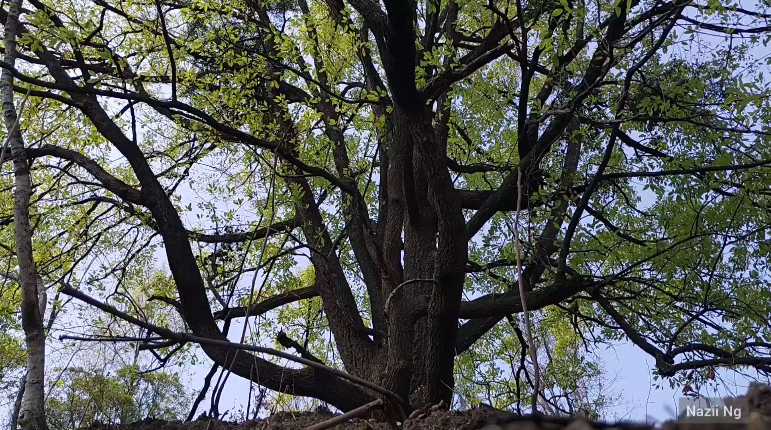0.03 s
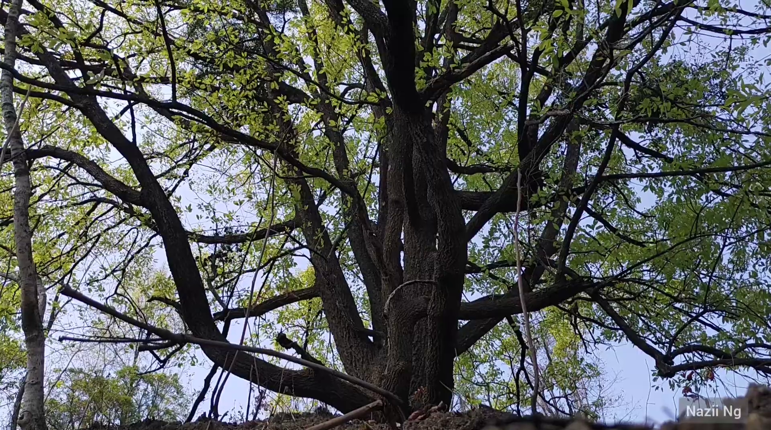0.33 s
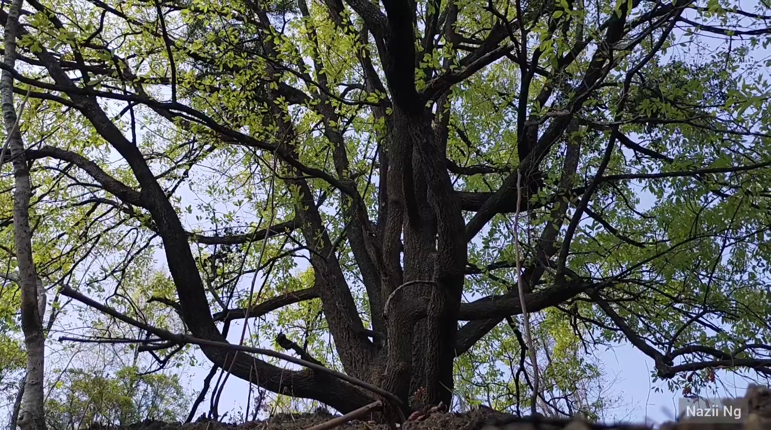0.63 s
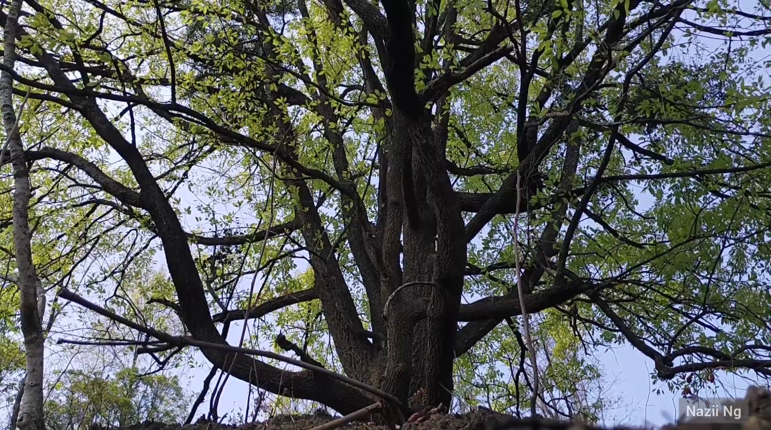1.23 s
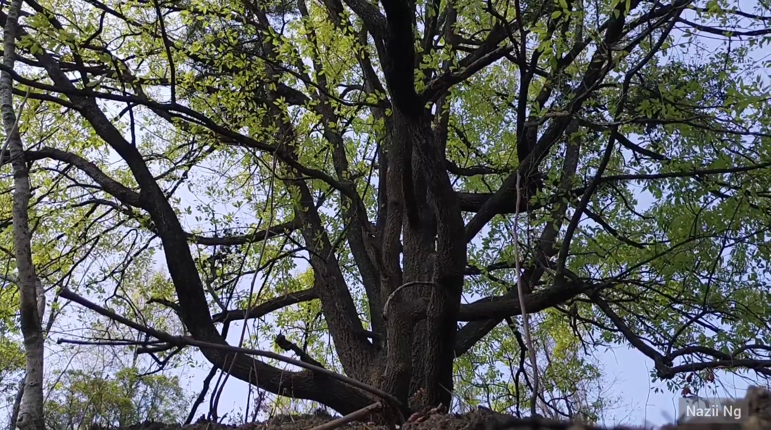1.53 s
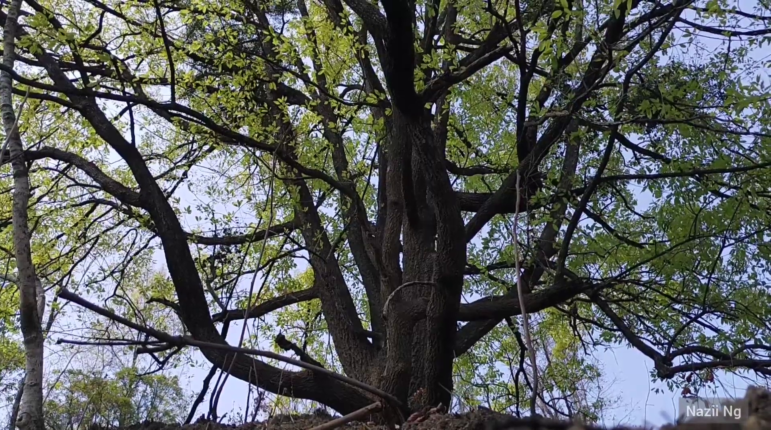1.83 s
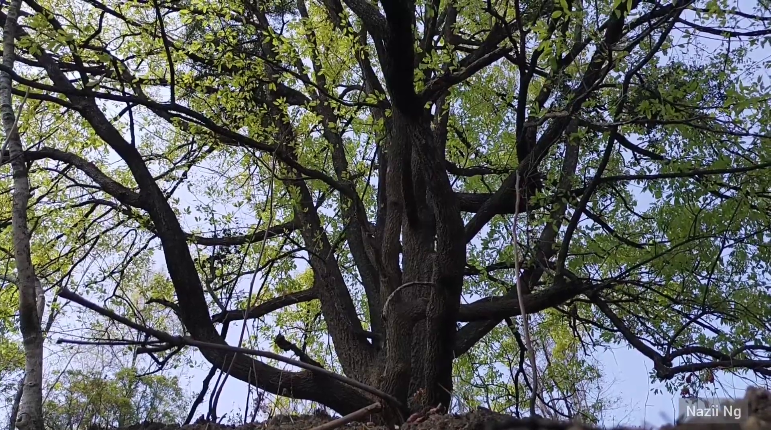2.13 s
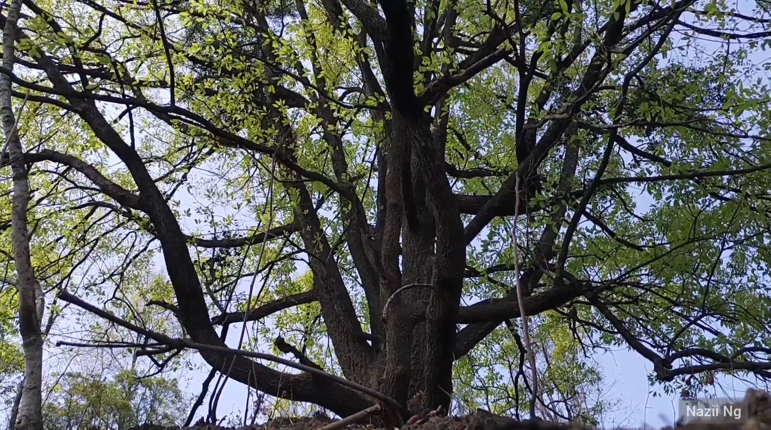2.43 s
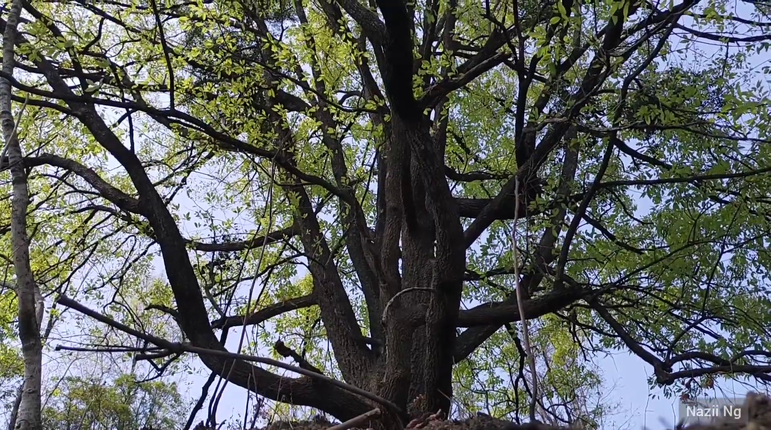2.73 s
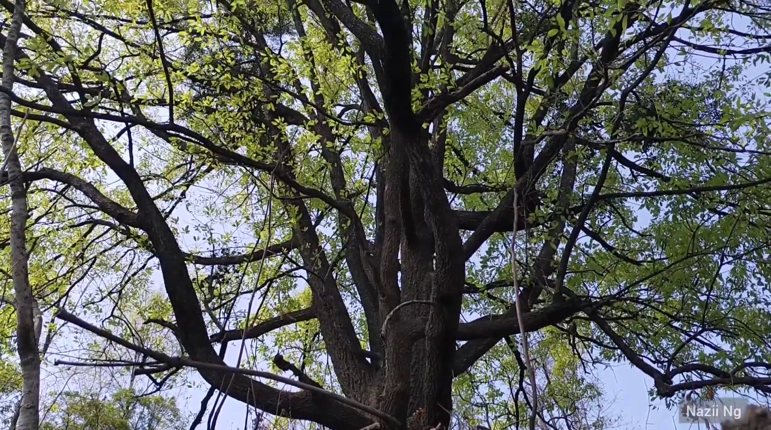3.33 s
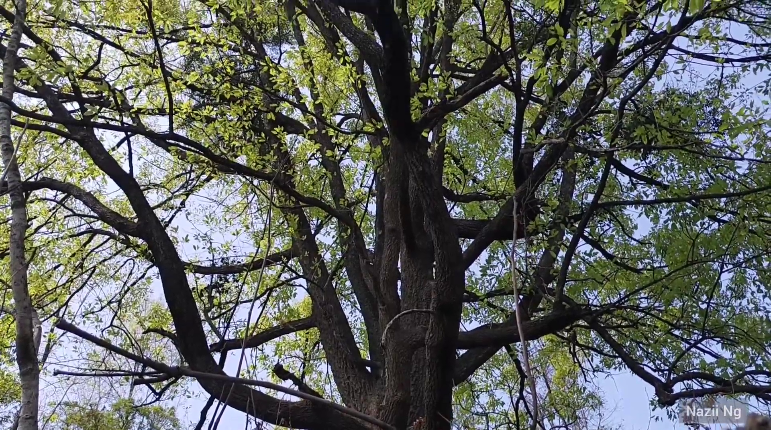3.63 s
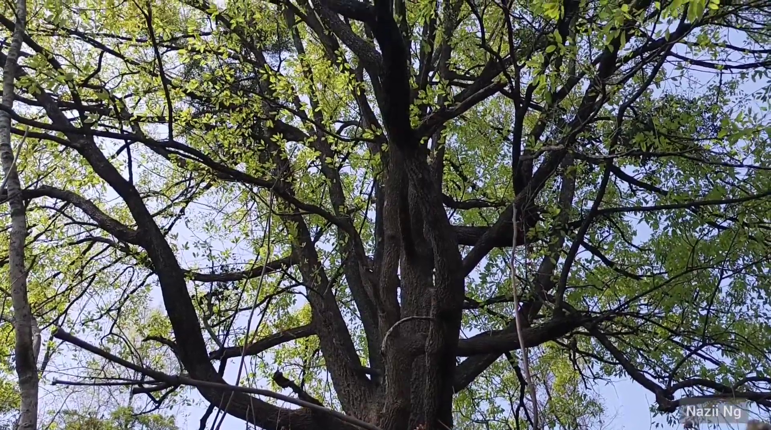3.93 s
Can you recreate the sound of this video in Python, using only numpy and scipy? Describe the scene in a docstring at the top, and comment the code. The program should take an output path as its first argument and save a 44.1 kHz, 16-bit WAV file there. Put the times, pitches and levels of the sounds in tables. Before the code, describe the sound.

A cuckoo gives a falling two-note call in a quiet wood, then repeats it as a distant finch trills. Faint whistles and chirps from other birds sit behind it, with soft, uneven wind rumble on the microphone.

```python
"""After a moment of silence, the hush of a spring wood swells in with a dying echo. Small birds whistle
far off, and a breeze starts to bump against the microphone. Leaves brush close by. Near 0.8 s a cuckoo
calls from a tree: a short note that rises and falls, then a longer, level one a third lower, each an
almost pure tone begun by a puff of air. The wood echoes it. From about 2 s a distant finch sings a
falling trill. Near 2.6 s the cuckoo calls again, and a small bird's warble ends the scene."""
import sys
import numpy as np
from scipy import signal
from scipy.fft import rfft, irfft
from scipy.io import wavfile
from scipy.ndimage import uniform_filter1d

SR = 44100
rng = np.random.default_rng(int(sys.argv[2]) if len(sys.argv) > 2 else 0)


def generate_wav(signal):
    """Clip the signal to [-1, 1] and save it as 16-bit WAV at the path in sys.argv[1]."""
    frames = np.transpose(np.atleast_2d(signal))
    scaled = np.clip(frames, -1, 1) * 32767
    pcm = np.round(scaled).astype(np.int16)
    wavfile.write(sys.argv[1], SR, pcm)


N = 176400
T = np.arange(N) / SR

# tone colour of the wood's hush: (frequency [Hz], relative level [dB])
HUSH_COLOUR = [(20, -3), (80, 0), (250, 0), (500, -2), (1100, 0), (1700, -8), (2500, -10.5), (3200, -8.5),
               (4500, -16), (6000, -17.5), (7400, -20.5), (8000, -32.5), (8600, -37.5), (14000, -49)]
# how the breeze swells and sinks: (time [s], level [dB])
BREEZE_LEVELS = [(.23, -91), (.28, -67.5), (.4, -55.5), (.58, -57.5), (.63, -33), (.76, -49), (.85, -31.5),
                 (.99, -39.5), (1.08, -56), (1.2, -46), (1.38, -54), (1.48, -28.5), (1.59, -46),
                 (1.72, -34), (1.8, -36), (2.0, -39), (2.17, -51), (2.3, -48.5), (2.49, -35), (2.8, -33.5),
                 (2.87, -42.5), (3.15, -37.5), (3.22, -40), (3.42, -34.5), (3.58, -32.5), (3.7, -53.5),
                 (3.82, -45.5), (3.96, -30), (4.0, -59)]
# tone colour of the breeze's rumble: (frequency [Hz], relative level [dB])
RUMBLE_COLOUR = [(15, -38), (30, -17.5), (50, 7.5), (75, 5), (120, -2), (170, -19.5), (240, -33.5),
                 (350, -38), (700, -73), (2000, -100)]
# the strongest bumps of air: (time [s], width [s], level [dB])
AIR_BUMPS = [(0.622, 0.0032, -28.5), (.645, 0.0061, -28), (0.698, 0.0027, -19), (0.91, 0.0019, -23.5),
             (1.003, 0.0041, -26), (1.463, 0.0021, -31), (1.5, 0.0023, -20.5), (1.7, 0.0023, -18),
             (1.888, 0.0029, -27), (1.952, 0.0043, -24), (2.023, 0.0035, -24.5), (2.386, 0.0036, -20.5),
             (2.719, 0.0035, -21.5), (2.823, 0.0032, -23), (2.935, 0.0022, -24), (3.183, 0.0041, -29),
             (3.372, 0.0025, -21), (3.44, 0.0025, -24.5), (3.506, 0.0027, -21.5), (3.569, 0.0022, -27.5)]
# leaves brushing close by: (time [s], width [s], level [dB])
LEAF_BRUSHES = [(.632, 0.016, -62), (.854, 0.0033, -52.5)]
# tone colour of the leaves: (frequency [Hz], relative level [dB])
LEAF_COLOUR = [(800, -21), (2000, -2), (4000, 3.5), (6800, 3.5), (7800, -11.5), (8500, -35)]
# thin, very high song: (start [s], length [s], first pitch [Hz], last pitch [Hz], level [dB])
HIGH_PHRASES = [(0.252, 0.77, 6340, 6510, -68), (1.451, .95, 6210, 6240, -74),
                (2.848, 1.0, 6390, 6110, -77.5)]
# small birds' notes:
# (start [s], length [s], first pitch [Hz], middle pitch [Hz], last pitch [Hz], relative level [dB])
BIRD_NOTES = [(0.155, 0.085, 4050, 4270, 4360, -69.5), (0.353, 0.062, 3750, 3690, 3780, -64),
              (1.67, 0.089, 3158, 3530, 3387, -55.5), (1.7, .22, 3505, 3496, 3418, -53.5),
              (1.886, 0.054, 3570, 3740, 3910, -59.5), (2.416, .085, 2087, 2144, 2204, -57.5),
              (2.492, 0.1, 2320, 2317, 2330, -64), (2.555, .09, 2066, 1964, 1960, -68),
              (2.761, 0.052, 1576, 1637, 1660, -62), (3.078, 0.032, 1754, 1640, 1610, -59.5),
              (3.211, 0.072, 2387, 2066, 2074, -55), (3.522, 0.042, 1990, 2083, 2520, -57.5),
              (3.554, 0.09, 2570, 3360, 2830, -54.5), (3.726, 0.063, 1464, 1612, 1630, -56.5),
              (3.761, 0.034, 1727, 1712, 1670, -49.5), (3.759, 0.043, 3710, 3680, 3800, -67.5),
              (3.792, 0.041, 2960, 2750, 2510, -62.5), (3.836, 0.084, 2240, 2335, 2190, -61.5)]
# quick rising chirps between the trill's last notes: (start [s], relative level [dB])
CHIRPS = [(2.625, -51.5), (2.785, -55.5), (2.934, -54), (3.087, -62), (3.231, -54)]
# the path of a warble: (time [s], centre pitch [Hz], relative level [dB])
WARBLE_SHAPE = [(3.81, 1767, -57), (3.88, 1912, -53.5), (3.94, 1917, -56.5), (4.0, 1920, -76)]
# the finch's falling notes: (start [s], top pitch [Hz], bottom pitch [Hz], relative level [dB])
TRILL_NOTES = [(1.96, 4000, 3750, -80.5), (2.055, 4240, 4010, -62), (2.155, 4400, 4270, -61.5),
               (2.225, 4400, 3910, -63.5), (2.285, 4410, 4060, -58), (2.335, 4210, 2960, -59),
               (2.38, 4500, 3870, -62), (2.425, 4110, 2940, -53), (2.505, 4230, 3197, -55.5),
               (2.59, 4000, 2855, -51.5), (2.675, 3900, 2830, -74.5), (2.74, 4000, 2896, -59.5),
               (2.885, 3960, 2994, -56), (3.033, 3900, 2697, -53), (3.18, 3900, 2950, -67)]
# echoes of the cuckoo's long note, drawn out by the trees: (delay [s], swell time [s], top level [dB])
LONG_ECHOES = [(.17, 0.081, -42.5), (.258, 0.094, -38.5), (.57, .13, -53.5), (1.15, .15, -63)]
# the dying echo of an earlier call: (start [s], pitch [Hz], level [dB], fall [dB/s])
DYING_ECHO = (.17, 497, -49, 130)
# tone colour of the puff that starts a cuckoo note: (frequency [Hz], relative level [dB])
PUFF_COLOUR = [(150, -40), (400, -12), (600, 0), (780, -5), (1100, -22), (2000, -45), (5000, -80)]
# the cuckoo's short note: (time in the note [s], pitch [Hz], level [dB])
SHORT_NOTE = [(0, 493.5, -52), (.018, 547, -32.5), (.038, 575.5, -20), (.058, 615.5, -26.5),
              (.092, 629.8, -24.5), (.111, 612, -30.5), (.123, 596, -17.5), (.139, 545, -26),
              (.15, 491, -50.5)]
# the cuckoo's long note: (time in the note [s], pitch [Hz], level [dB])
LONG_NOTE = [(0, 481, -40), (.009, 497.3, -31), (.035, 504.8, -26), (.11, 504, -24), (.165, 504, -26),
             (.205, 499, -30.5), (.23, 485.7, -35.5), (.241, 441, -46)]
# faint higher tones in the short note: (pitch multiple, level against the main tone [dB], peak time [s])
SHORT_OVERTONES = [(2, -35.5, 0.044), (3, -35, 0.076), (6, -47, 0.1), (7, -33, 0.09)]
# faint higher tones in the long note: (pitch multiple, level against the main tone [dB], peak time [s])
LONG_OVERTONES = [(2, -36, 0.042), (3, -42.5, 0.12), (4, -45, 0.051), (6, -43.5, .17)]
# cuckoo calls: (short note's start [s], long note's start [s], short note's pitch factor, gain [dB])
CALLS = [(0.774, 1.121, .997, 0), (2.558, 2.914, 1.007, 0)]

SILENCE_S = 0.1945
HUSH_DB, HUSH_RISE_S, HUSH_RISE_DB = -60.5, .11, 13
WARBLE_PER_S, WARBLE_DEPTH = 33, 0.075
ECHO_HZ, ECHO_WAVER_HZ = 502, 1.1
SHORT_ECHO_S, SHORT_ECHO_DB = 0.17, -25.5
SHORT_SCATTER_DB, LONG_SCATTER_DB = -12.5, -23
CUCKOO_WAVER, RASP_DB = 0.0017, -40.5


def amp(db):
    """Turns decibels into a number to multiply a sound by."""
    return 10 ** (np.asarray(db) / 20)


def unit(x):
    """Scales a signal so that its average power is 1."""
    return x / np.sqrt(np.mean(x ** 2) + 1e-20)


def curve(points, t, column=1):
    """Reads a table's column at times t, joining its points with straight lines."""
    rows = np.array(points)
    return np.interp(t, rows[:, 0], rows[:, column])


def add(mix, start, sound):
    """Mixes a sound in at a start time in seconds."""
    part = mix[max(round(start * SR), 0):][:len(sound)]
    part += sound[:len(part)]


def keep_side(x, side, hz, order=2):
    """Keeps the "low" or "high" side of hz; a bigger order cuts more sharply."""
    return signal.sosfilt(signal.butter(order, hz, side, fs=SR, output="sos"), x)


def noise(colour):
    """Steady noise with the given tone colour."""
    hz, db = np.transpose(colour)
    gain = amp(np.interp(np.log(np.fft.rfftfreq(N, 1 / SR) + 1), np.log(hz), db))
    return unit(irfft(rfft(rng.standard_normal(N)) * gain, N))


def wander(size, hz):
    """A smooth random wobble, mostly slower than hz."""
    freqs = np.fft.rfftfreq(SR, 1 / SR)
    spectrum = rfft(rng.standard_normal(SR)) / (1 + (freqs / hz) ** 4)
    return np.resize(unit(irfft(spectrum, SR)), size)


def sine(hz):
    """A pure tone of power 1 that follows a changing pitch."""
    return np.sqrt(2) * np.sin(2 * np.pi * np.cumsum(hz) / SR)


def scatter(x, fade_s):
    """Sound bouncing off trunks and leaves: many tiny echoes that fall 60 dB in fade_s."""
    t = T[:2 * SR]
    arrives = (rng.random(len(t)) < 2000 / SR) * (t > .03)  # about 2000 echoes a second
    bounces = rng.choice([-1., 1.], len(t)) * arrives * amp(-60 * t / fade_s)
    return signal.fftconvolve(x, bounces / np.linalg.norm(bounces))[:N]


def hush():
    """The faint wash of the wood, swelling in at the start."""
    still_to_rise = np.clip(1 - (T - SILENCE_S) / HUSH_RISE_S, 0, 1)
    return noise(HUSH_COLOUR) * amp(HUSH_DB - HUSH_RISE_DB * still_to_rise)


def breeze():
    """Lumpy rumble at the microphone, with single dips of pressure as swirls of air pass."""
    air = noise(RUMBLE_COLOUR) * amp(curve(BREEZE_LEVELS, T))
    for time, width, db in AIR_BUMPS:
        offset = (T - time) / width
        air += amp(db) * (offset ** 2 - 1) / (1 + offset ** 2 / 5) ** 4
    return keep_side(air, "high", hz=30)


def tick(start=.7875, width_s=0.00038, peak_db=-19):
    """One sharp tick right at the microphone."""
    age = np.arange(400) / SR / width_s
    pulse = keep_side((age - 1) * np.exp(-age), "low", hz=460, order=1)
    pulse = keep_side(pulse, "low", hz=7000, order=12)
    out = np.zeros(N)
    add(out, start, amp(peak_db) * pulse / abs(pulse).max())
    return out


def leaves():
    """Leaves brush close by in brief swells of hiss."""
    level = sum(amp(db) * np.exp(-((T - time) / width) ** 2) for time, width, db in LEAF_BRUSHES)
    return level * noise(LEAF_COLOUR)


def high_song(spread_hz=480):
    """Very high, far birdsong, smeared by the leaves into a thin, drifting hiss."""
    song = np.zeros(N)
    for start, length, first, last, db in HIGH_PHRASES:
        size = int(length * SR)
        phase = 2 * np.pi * np.cumsum(np.linspace(first, last, size)) / SR
        hiss = wander(size, spread_hz) * np.cos(phase) + wander(size, spread_hz) * np.sin(phase)
        level = amp(db + 0.74 * wander(size, hz=25)) * signal.windows.tukey(size, 0.37)
        add(song, start, level * hiss)
    return song


def whistle(length, first, middle, last, db):
    """A small bird's note: a wavering pure tone sliding through three pitches."""
    size = int(length * SR)
    arc = np.polyfit([0, .5, 1], [first, middle, last], 2)
    hz = np.polyval(arc, np.linspace(0, 1, size)) * (1 + 0.0037 * wander(size, hz=90))
    level = amp(db + 1.8 * wander(size, hz=45)) * signal.windows.tukey(size, .5)
    return level * sine(hz)


def warble():
    """A note that swings quickly in pitch, loudest at the bottom of each swing."""
    t = np.arange(WARBLE_SHAPE[0][0], WARBLE_SHAPE[-1][0], 1 / SR)
    swing = np.cos(2 * np.pi * WARBLE_PER_S * (t - t[0]))
    hz = curve(WARBLE_SHAPE, t) * (1 + WARBLE_DEPTH * swing)
    level = amp(curve(WARBLE_SHAPE, t, column=2) - 4.2 * swing) * signal.windows.tukey(len(t), .1)
    return level * sine(hz)


def songbirds():
    """Whistles, chirps and a warble, heard both directly and bouncing off the trees."""
    song, chirps = np.zeros((2, N))
    for start, *note in BIRD_NOTES:
        add(song, start, whistle(*note))
    for start, db in CHIRPS:
        add(chirps, start, whistle(length=0.031, first=2776, middle=3150, last=4200, db=db))
    add(song, WARBLE_SHAPE[0][0], warble())
    direct = amp(-2) * song + amp(-4.5) * chirps
    return direct + amp(-5.5) * scatter(song + chirps, fade_s=0.55)


def finch(note_s=.04):
    """A far trill of falling notes that arrives mostly by bouncing off the trees."""
    song = np.zeros(N)
    for start, top, bottom, db in TRILL_NOTES:
        add(song, start, whistle(note_s, top, (top + bottom) / 2, bottom, db))
    return amp(-10) * song + scatter(song, fade_s=.8)


def long_echo():
    """The cuckoo's long note coming back from the wood: swells near its pitch, each dying slowly."""
    t = T[:2 * SR]
    level = np.zeros(len(t))
    for delay, swell, db in LONG_ECHOES:
        age = np.maximum(t - delay, 0) / swell
        level += amp(db) * (age * np.exp(1 - age)) ** 2
    return level * sine(ECHO_HZ + ECHO_WAVER_HZ * wander(len(t), hz=11))


def wood_echoes(short_notes, long_notes):
    """The wood's muffled answer to the cuckoo: separate echoes and a fading wash of tiny ones."""
    echoes = np.zeros(N)
    for _, long_start, _, db in CALLS:
        add(echoes, long_start, amp(db) * long_echo())
    add(echoes, SHORT_ECHO_S, amp(SHORT_ECHO_DB) * short_notes)
    start, hz, db, fall = DYING_ECHO
    add(echoes, start, amp(db - fall * T[:SR]) * np.sin(2 * np.pi * hz * T[:SR]))
    wash = scatter(amp(SHORT_SCATTER_DB) * short_notes + amp(LONG_SCATTER_DB) * long_notes, fade_s=1.48)
    return keep_side(echoes + wash, "low", hz=1300)


def puff(db, rise_s=0.0065):
    """The soft rush of air that starts a cuckoo note."""
    age = T[:SR // 10] / rise_s
    return amp(db) * noise(PUFF_COLOUR)[:len(age)] * age * np.exp(1 - age)


def hoot(shape, overtones, swell_s, tuning=1):
    """One cuckoo note: a nearly pure tone with a trace of rasp; faint higher tones come and go."""
    t = np.arange(0, shape[-1][0], 1 / SR)
    waver = 1 + CUCKOO_WAVER * wander(len(t), hz=70)
    hz = uniform_filter1d(curve(shape, t), size=300) * tuning * waver
    phase = 2 * np.pi * np.cumsum(hz) / SR
    tone = np.sin(phase) * (1 + amp(RASP_DB) * wander(len(t), hz=1000))
    for multiple, db, peak_time in overtones:
        swell = np.exp(-multiple / 5 * ((t - peak_time) / swell_s) ** 2)  # briefer for higher tones
        tone += amp(db) * swell * np.sin(multiple * phase)
    level = uniform_filter1d(amp(curve(shape, t, column=2)), size=200)
    return np.sqrt(2) * level * signal.windows.tukey(len(t), .04) * tone


def cuckoo():
    """Two calls, each a short note and then a long one, with the wood's echoes."""
    short_notes, long_notes = np.zeros((2, N))
    for short_start, long_start, tuning, db in CALLS:
        short_hoot = hoot(SHORT_NOTE, SHORT_OVERTONES, swell_s=.028, tuning=tuning)
        add(short_notes, short_start, amp(db) * short_hoot)
        add(short_notes, short_start, puff(db=-42.5))
        add(long_notes, long_start, amp(db) * hoot(LONG_NOTE, LONG_OVERTONES, swell_s=.08))
        add(long_notes, long_start, puff(db=-49))
    return short_notes + long_notes + wood_echoes(short_notes, long_notes)


def scene():
    """Air, leaves, small birds and the cuckoo, mixed into one channel."""
    background = hush() + breeze() + tick() + leaves()
    small_birds = high_song() + songbirds() + finch()
    return (background + small_birds + cuckoo())[None]


def record(dry):
    """Keeps the first moment silent and cuts away the very highest treble."""
    gate = uniform_filter1d(1. * (T > SILENCE_S), size=100)
    treble_cut = signal.firwin(511, cutoff=15000, window=("kaiser", 9), fs=SR)
    return signal.oaconvolve(dry * gate, treble_cut[None], "same")


dry = scene()
out = record(dry)
generate_wav(out)
```